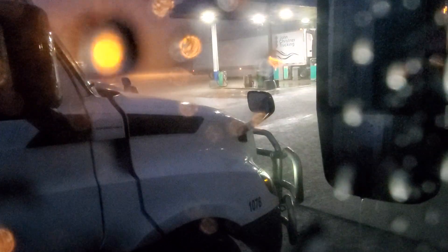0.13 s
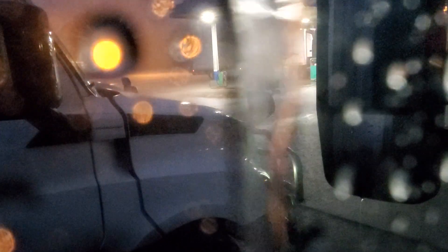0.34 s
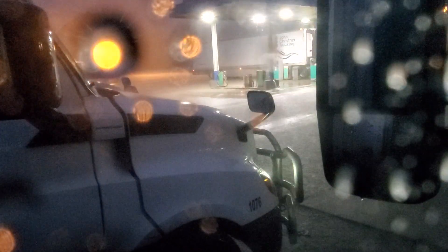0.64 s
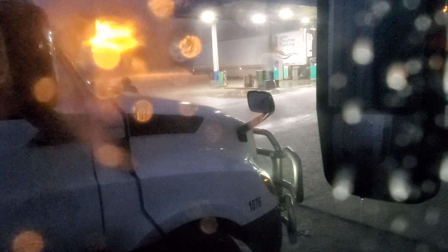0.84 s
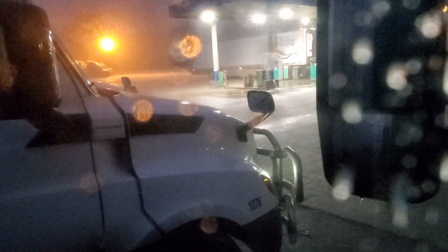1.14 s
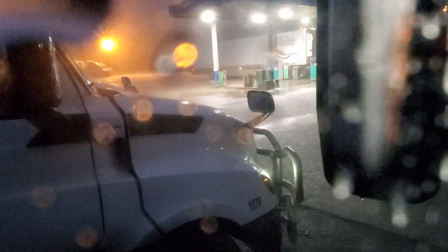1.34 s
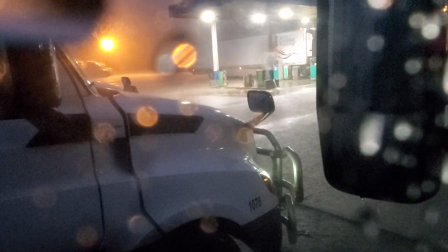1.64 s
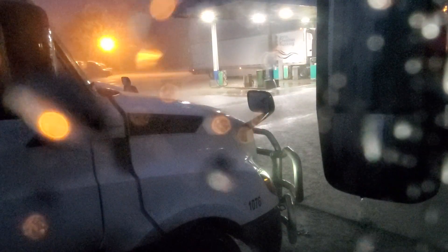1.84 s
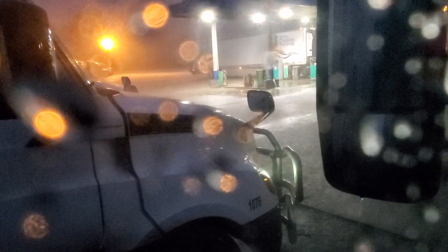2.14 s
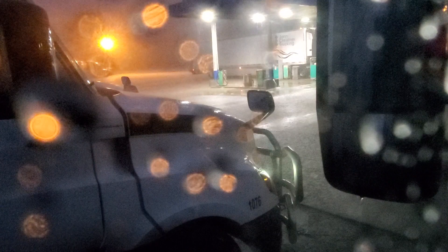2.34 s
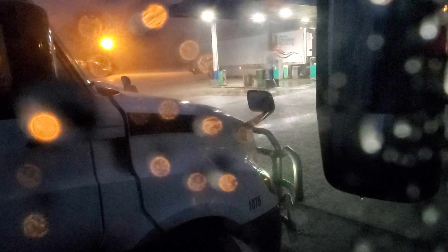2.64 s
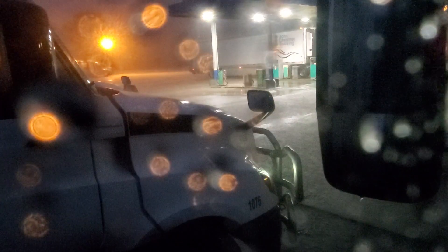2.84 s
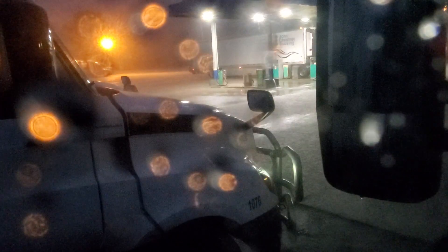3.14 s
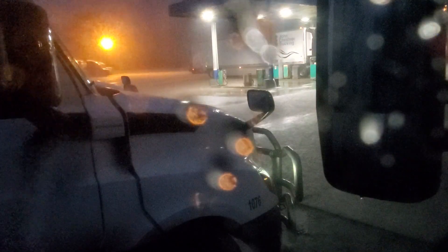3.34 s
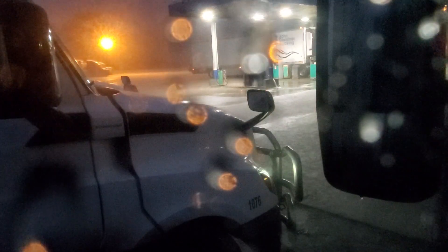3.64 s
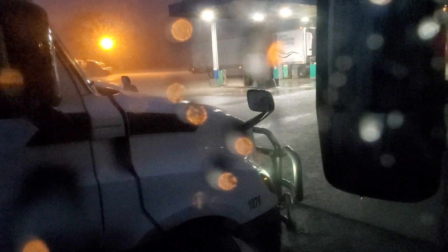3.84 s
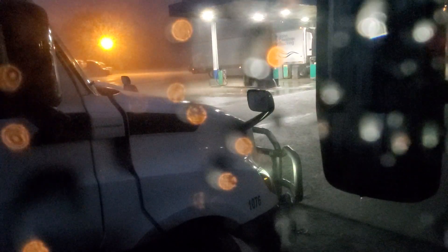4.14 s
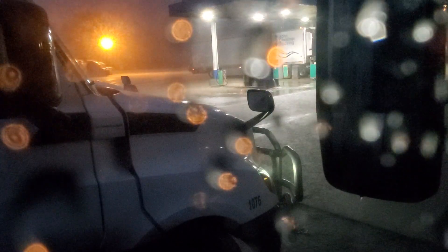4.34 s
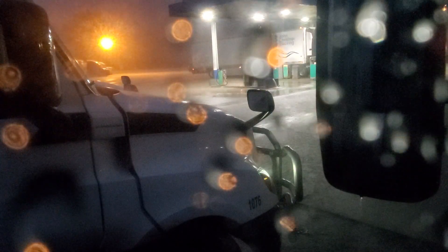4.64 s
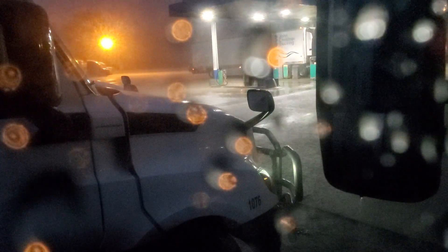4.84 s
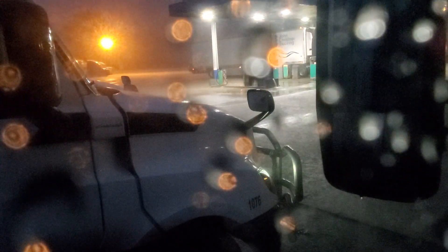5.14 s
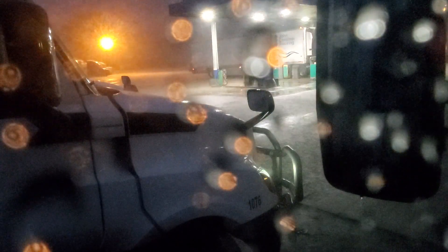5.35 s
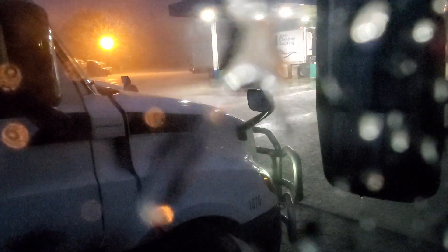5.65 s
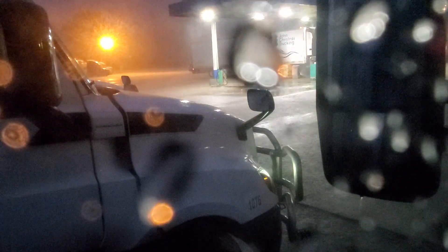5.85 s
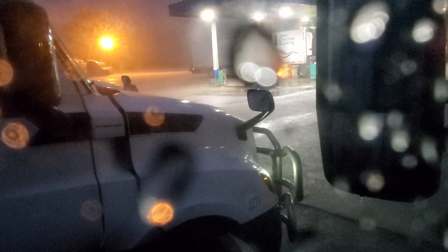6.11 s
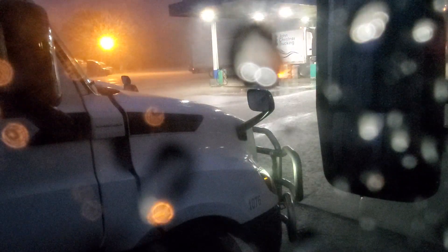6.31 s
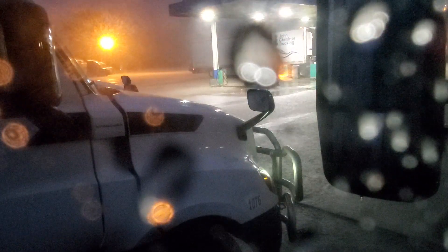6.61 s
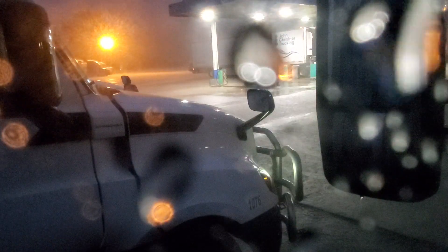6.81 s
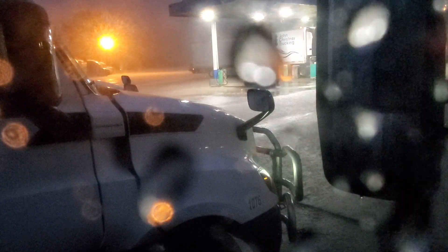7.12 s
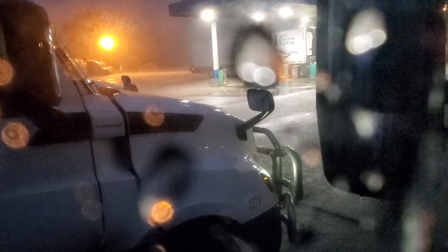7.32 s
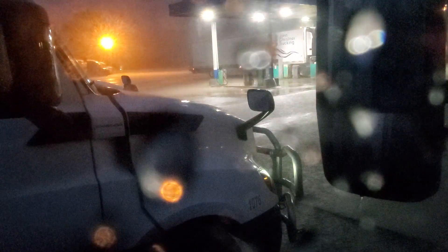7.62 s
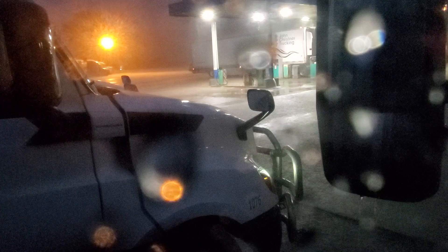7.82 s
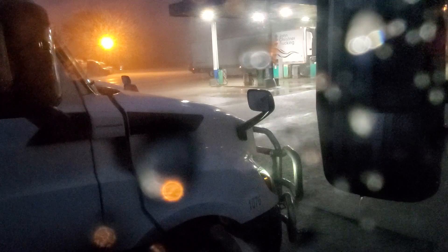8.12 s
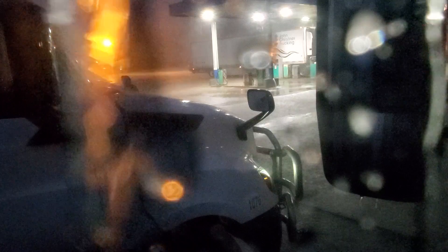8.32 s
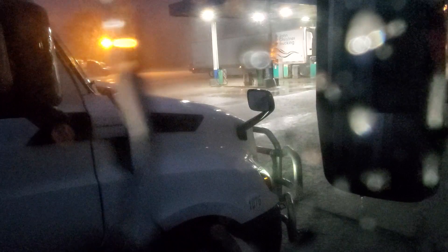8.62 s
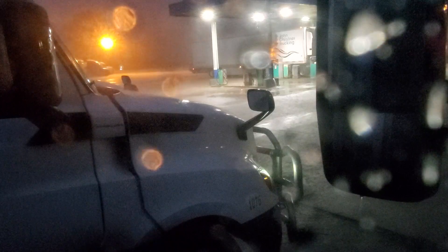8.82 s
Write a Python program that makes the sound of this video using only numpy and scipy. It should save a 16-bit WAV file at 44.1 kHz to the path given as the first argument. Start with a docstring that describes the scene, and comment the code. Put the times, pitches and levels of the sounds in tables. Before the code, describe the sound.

From inside a parked truck cab, a deep diesel idle runs for the whole nine seconds, a centred bass throb near 45 hertz, swelling and sinking roughly once a second as neighbouring trucks slide in and out of step. A soft hollow drone fills the cab. Rain drums dully on the lined roof, patters brighter on panels and leaves a faint hiss of spray on glass, in wide stereo. Crisp drops tick on the near window, leaning left, notably at about 2.5, 4.0, 5.5 and 8.8 s, among tiny metallic pings and plinks. Rain strengthens around 2 to 3.5 s; far thunder murmurs beneath and rolls gently at 4.2 s. Short flurries come near 5.7, 6.2 and 6.9 s. The rain eases around 7.5 s, then from about 7.7 s slants, less roof drumming and more bright patter, with flurries at 8.15 and 8.6 s, building to the end.

```python
"""A slow bass throb runs throughout: from the seat of a parked diesel truck, its engine and its neighbours' idle at
slightly different speeds, as summed tones that slide in and out of step. Rain drums on the cab as showers of
noise bursts; single drops tick on the near left window as noise, and pats and plinks sound within the rain as
short noise and decaying sines. Under it, far thunder murmurs and rolls once, and the cab drones, both as shaped
noise. A two-port microphone hears the rain and thunder in stereo and the engines alike in both ports."""
import sys
import numpy as np
from scipy import signal
from scipy.fft import rfft, irfft, next_fast_len
from scipy.io import wavfile
from scipy.ndimage import map_coordinates

SR = 44100
rng = np.random.default_rng(int(sys.argv[2]) if len(sys.argv) > 2 else 0)


def store_pcm(level_fs):
    """Save levels as 16-bit WAV."""
    pcm = np.round(np.clip(level_fs, -1, 1) * 32767).astype(np.int16)
    wavfile.write(sys.argv[1], SR, np.atleast_2d(pcm).T)


N = 395577
TIME = np.arange(N) / SR


def amp(db):
    """Decibels to gain."""
    return 10 ** (np.asarray(db) / 20)


def unit(x):
    """Scaled to rms 1."""
    return x / np.sqrt(np.mean(x ** 2) + 1e-20)


def along(points, hz):
    """(frequency [Hz], value) points joined on a log frequency axis."""
    f, v = np.transpose(points)
    return np.interp(np.log(hz + 1), np.log(f + 1), v)


def curves(rows):
    """One value per sample for each column after the time."""
    s, *cols = np.transpose(rows)
    return [np.interp(TIME, s, c) for c in cols]


def wobble(rate):
    """A smooth random curve, rate knots a second."""
    knots = rng.standard_normal(int(N * rate / SR) + 4)
    return map_coordinates(knots, [TIME * rate])


def swell(at, rise, fall):
    """A smooth hump of height 1 at time at [s]."""
    width = np.where(TIME < at, rise, fall)
    return np.exp(-((TIME - at) / width) ** 2)


def filtered(x, response):
    """x times a response of frequency."""
    n = x.shape[-1]
    m = next_fast_len(n + 4096)
    spectrum = rfft(x, m) * response(np.fft.rfftfreq(m, 1 / SR))
    return irfft(spectrum, m)[..., :n]


def add(track, s, sound):
    """Mix a short stereo sound in at time s."""
    room = track[:, max(round(s * SR), 0):][:, :sound.shape[1]]
    room += sound[:, :room.shape[1]]


# likeness of the two microphone ports: (frequency [Hz], likeness [0-1])
PORT_LIKENESS = [(180, 0.98), (300, 0.91), (480, 0.63), (820, 0.7), (960, 0.27), (1500, 0.45), (2600, 0.11),
                 (4400, 0.083), (6000, .05)]
# lead of the left port: (frequency [Hz], lead [s])
LEFT_LEAD = [(200, 0.000048), (480, 0.00011), (680, .00001), (830, 0.000028), (970, 0.00037),
             (4400, 0.000396)]


def in_cab(pair, spectrum):
    """Colour two unrelated signals and spread them: bass alike in both ports, left a little early, mid at rms 1."""
    def mid_and_side(hz):
        turn = np.arccos(np.clip(along(PORT_LIKENESS, hz), 0, 1)) / 2
        return amp(along(spectrum, hz)) * [np.cos(turn), np.sin(turn)]

    mid, side = filtered(pair, mid_and_side)
    right = filtered(mid - side, lambda hz: np.exp(-2j * np.pi * hz * along(LEFT_LEAD, hz)))
    ears = np.array([mid + side, right])
    return ears / np.std(ears.mean(0))


# resonances of the cab, its panels and its glass: (frequency [Hz], width [Hz], lift [dB])
CAB_RESONANCES = [(236, 20, 2), (314, 18, 3), (395, 20, 2.5), (440, 26, 2), (546, 26, 3), (598, 22, 2),
                  (655, 44, 3), (828, 40, 2.5), (1660, 90, 2), (2680, 170, 2), (3900, 130, 3),
                  (4500, 180, 3.5), (5750, 250, 3)]


def cab_colour(hz):
    """The gain that the cab's resonances give to the weather sounds."""
    lifts = (db / (1 + (2 * (hz - centre) / width) ** 2) for centre, width, db in CAB_RESONANCES)
    return amp(sum(lifts))


THUNDER_DB, THUNDER_FADE_DB_PER_S = -36.5, .1
ROLL_AT_S, ROLL_RISE_S, ROLL_FALL_S, ROLL_DB = 4.23, 0.42, 0.2, 7
# spectrum of far thunder: (frequency [Hz], relative level [dB per Hz])
THUNDER_SPECTRUM = [(12, -24), (26, -15), (37, -10), (45, -1), (51, 0), (60, -3), (76, -9), (110, -25),
                    (250, -60)]


def thunder(waver_db=0.9):
    """Far thunder is low noise: a murmur that fades, and one roll that swells out of it."""
    roll_db = ROLL_DB * swell(ROLL_AT_S, ROLL_RISE_S, ROLL_FALL_S)
    level_db = THUNDER_DB - THUNDER_FADE_DB_PER_S * TIME + roll_db + waver_db * wobble(2.99)
    return amp(level_db) * in_cab(rng.standard_normal((2, N)), THUNDER_SPECTRUM)


DRONE_DB, DRONE_ROLL_DB = -34.5, 3.5  # its level, and how much the thunder roll lifts it
# spectrum of the hollow cab: (frequency [Hz], relative level [dB per Hz])
DRONE_SPECTRUM = [(60, -45), (78, -4.5), (100, -2), (120, -3), (155, 1.5), (200, -1.5), (235, -5.5),
                  (270, -11.5), (450, -43), (1000, -72)]


def drone(shake=0.31, waver_db=1.0):
    """The cab's hollow drone is noise shaken by each firing of the first truck."""
    roll_db = DRONE_ROLL_DB * swell(ROLL_AT_S, ROLL_RISE_S, ROLL_FALL_S)
    level_db = DRONE_DB + roll_db + waver_db * wobble(2.97)
    rate, first, _ = TRUCKS[0]
    firing = 1 + shake * np.cos(2 * np.pi * rate * (TIME - first))
    return amp(level_db) * in_cab(firing * rng.standard_normal((2, N)), DRONE_SPECTRUM)


def pings(rate=110, db=-45, spread_db=1.0, pitch_hz=1900, octaves=.7, cycles=70):
    """Small drops each ring one spot of sheet metal or glass, at its own pitch; high ones are fainter."""
    track, t = np.zeros((2, N)), np.arange(SR // 12) / SR
    for when, size, high, low, side in rng.random((int(rate * N / SR), 5)):
        # pitches crowd round the middle and reach twice the octaves either way
        hz = pitch_hz * 2 ** (2 * octaves * (high - low))
        level = db - spread_db * np.log(size + 0.035) - 14 * np.log10(hz / pitch_hz)
        fade = amp(level - 60 * t * hz / cycles)  # 60 dB down after this many cycles
        # a different phase at the right port
        ring = np.sin(2 * np.pi * (hz * t + [[0], [side]])) * fade
        add(track, when * N / SR, ring)
    return track


# short pats and plinks within the rain, dull or bright: (time [s], relative level [dB], pitch [Hz])
PATS_AND_PLINKS = [(0.085, -25, 636), (0.673, -27, 1270), (1.114, -31, 2610), (1.224, -29, 560),
                   (2.457, -27, 2600), (2.912, -27.5, 1340), (3.178, -34.5, 3840), (3.319, -29, 2640),
                   (3.645, -28, 930), (3.773, -28, 1260), (5.455, -28, 1250), (6.156, -26, 540),
                   (6.19, -26.5, 1650), (6.386, -29, 1265), (7.772, -25, 1170), (8.392, -28, 600),
                   (8.569, -28, 1880), (8.889, -28, 1180)]
# modes of each plink, as of sheet metal: (multiple of its pitch, relative level [dB])
SHEET_MODES = [(.62, -7), (.93, -9), (1, 1), (1.09, -2.5), (1.47, -12.5), (2.1, -24)]


def pats_and_plinks(t60=0.044, pat_db=-1, pat_t60=0.02, pat_reach=1.5):
    """A short pat of noise, as dull or bright as its pitch, over the dying modes of sheet metal."""
    track, t = np.zeros((2, N)), np.arange(SR // 6) / SR
    for s, db, pitch_hz in PATS_AND_PLINKS:
        plink = 0
        for k, level in SHEET_MODES:
            tone = np.sin(2 * np.pi * (k * pitch_hz * t + rng.random()))
            plink = plink + amp(level - 60 * t / t60) * tone
        noise = rng.standard_normal((2, len(t)))
        pat = unit(filtered(noise, lambda hz: 1 / (1 + (hz / (pat_reach * pitch_hz)) ** 2)))
        add(track, s, amp(db - 7.5) * (plink + amp(pat_db - 60 * t / pat_t60) * pat))
    return track


# small drops fall at random, with scattered (drop, tap, splash) relative levels [dB]
SMALL_DROPS_PER_S, SMALL_DROP, SMALL_SCATTER_DB = 1.8, (-40, -4.5, -15), 1.5
SMALL_FOLLOWS_RAIN = 1.4  # bigger in heavier rain: dB for each dB in the rain table
# big drops on the near window: (time [s], relative level [dB], relative tap [dB], relative splash [dB])
BIG_DROPS = [(1.3748, -35, -15, -17), (2.1824, -32.5, -1, -16), (2.4551, -26.5, -5, -16),
             (2.5301, -34, -6, -17), (2.6918, -35.5, -4, -15), (3.472, -35, -9, -21),
             (3.5264, -35, -2, -20), (3.5733, -38, -5, -17), (3.921, -44, -6, -5), (4.0412, -30, -5, -17),
             (4.7995, -33, 0.5, -17), (4.9095, -33, -2.5, -13), (4.9891, -32.5, -5, -19),
             (5.4548, -25.5, -5.5, -23), (5.9199, -36, -11, -5), (6.2038, -36.5, -9, -17),
             (7.2416, -34, -3, -26), (7.8152, -40.5, 5, -11), (8.143, -38, 1, -18), (8.5688, -39.5, 7, -18),
             (8.8174, -27.5, -7, -11.5)]


def window_drops(t60=0.039, tail_db=-25, tail_t60=0.25, rise=0.00098):
    """Each near drop taps the glass, ticks and splashes; the small cab holds the sound for a moment."""
    track, t = np.zeros((2, N)), np.arange(SR // 8) / SR
    body_and_tail = amp(-60 * t / t60) + amp(tail_db - 60 * t / tail_t60)
    fade = body_and_tail * (1 - np.exp(-t / rise))
    small = []
    for _ in range(int(SMALL_DROPS_PER_S * N / SR)):
        s = rng.random() * N / SR
        db, tap_db, splash_db = SMALL_DROP + SMALL_SCATTER_DB * rng.standard_normal(3)
        rain_db = np.interp(s, *np.transpose(RAIN_STRENGTH))
        small.append((s, db + SMALL_FOLLOWS_RAIN * rain_db, tap_db, splash_db))
    for s, db, tap_db, splash_db in list(BIG_DROPS) + small:
        # (frequency [Hz], level [dB])
        tap = [(400, tap_db - 2), (1500, tap_db + 7.0), (3700, tap_db + 3.0)]
        tick = [(5200, -7), (8000, -11)]
        splash = [(10000, splash_db - 0.5), (13000, splash_db + 5), (15800, splash_db - 7)]
        noise = rng.standard_normal((2, len(t)))
        burst = filtered(noise, lambda hz: amp(along(tap + tick + splash, hz)))
        add(track, s, amp(db + 5.5) * fade * burst * amp([[1], [-1]]))  # stronger on the left
    return track


def shower(rate, spread_db, t60, wash_db):
    """Countless impacts of random size, each a dying burst, over the wash of those too far to tell apart."""
    draws = rng.random((int(rate * N / SR), 3))
    size = amp(-spread_db * np.log(draws[:, 1] + .01))
    place = (draws[:, 0] * N).astype(int)
    ring = amp(-60 * np.arange(SR // 8) / SR / t60) ** 2
    shares = (.5 + draws[:, 2], 3 / 2 - draws[:, 2])  # of the energy, left and right
    energy = np.array([np.bincount(place, size ** 2 * share, N) for share in shares])
    energy = np.abs(signal.fftconvolve(energy, ring[None], axes=1)[:, :N])
    return np.sqrt(energy / energy.mean() + amp(wash_db) ** 2) * rng.standard_normal((2, N))


# late on, the wind slants the rain off the roof and onto the panels and glass
SLANT_START_S, SLANT_TAKES_S = 7.68, .55
# each surface: (level [dB], dB for each dB of rain, change with the slant [dB])
ON_ROOF, ON_PANELS, ON_GLASS = (-38, 0.98, -1.7), (-44, 1, 1.3), (-59, 0.95, 2.2)
FLURRY_RISE_S, FLURRY_FALL_S = 0.1, 0.078
# how hard it rains, before each surface's response: (time [s], level over the usual [dB])
RAIN_STRENGTH = [(0, -.3), (.4, -1.5), (1.05, -0.45), (1.8, 0.4), (2.7, 1), (3.05, 0.8), (3.35, 1.5),
                 (4.65, -1.55), (4.9, 0), (5.55, .3), (6, -1.7), (6.6, -0.4), (7.05, 0.7), (7.35, -1.5),
                 (8, -2.5), (8.97, 1.4)]
# flurries of heavier rain, added to that strength: (time of the height [s], extra level [dB])
RAIN_FLURRIES = [(2.14, 2), (2.5, 0.8), (5.72, 2.5), (6.18, 2), (6.85, 2), (8.15, 3), (8.61, 1.5)]
# spectra of rain on the roof, panels and glass: (frequency [Hz], relative level [dB per Hz])
ROOF_SPECTRUM = [(150, -33), (260, 0), (330, -1), (430, 0), (600, -2), (715, -5.5), (820, -5), (950, -7),
                 (1300, -23), (3000, -62)]
PANEL_SPECTRUM = [(600, -8), (950, 0.5), (1200, 3.5), (1450, 1), (1800, 1), (2250, -2.5), (2700, -5),
                  (3300, -9.5), (4300, -15.5), (5200, -25.5), (9000, -39)]
SPRAY_SPECTRUM = [(2500, -23), (4300, -1), (6300, 0.5), (7000, 0.5), (8100, 2), (9000, -5), (10500, -6.5),
                  (12300, -2), (14000, -6.5), (15800, -10)]


def rain(flutter_db=0.77, waver_db=0.29):
    """One rainfall drives dull drumming on the lined roof, brighter patter on the panels, fine spray on the glass."""
    strength_db = curves(RAIN_STRENGTH)[0] + waver_db * wobble(8)
    for s, db in RAIN_FLURRIES:
        strength_db = strength_db + db * swell(s, FLURRY_RISE_S, FLURRY_FALL_S)
    slant = np.clip((TIME - SLANT_START_S) / SLANT_TAKES_S, 0, 1)
    roof_db, panel_db, spray_db = [db + follows * strength_db + slant_db * slant
                                   for db, follows, slant_db in (ON_ROOF, ON_PANELS, ON_GLASS)]
    spray_db = spray_db + flutter_db * wobble(14)  # the light spray also flutters quickly
    roof = in_cab(shower(rate=300, spread_db=3.0, t60=0.09, wash_db=1.5), ROOF_SPECTRUM)
    panels = in_cab(shower(rate=260, spread_db=3, t60=.035, wash_db=4.0), PANEL_SPECTRUM)
    spray = in_cab(shower(rate=150, spread_db=3.5, t60=0.075, wash_db=1.5), SPRAY_SPECTRUM)
    return amp(roof_db) * roof + amp(panel_db) * panels + amp(spray_db) * spray


# idling trucks: (firing rate [1/s], time of a firing [s], phase offset of the tones [rad])
TRUCKS = [(45.012, .0001, .4), (43.76, .0156, 4.1), (44.825, .0231, .4), (41.668, .0191, 1),
          (32.51, .0244, 1), (38.503, .0258, 1)]
# exhaust tones, one list for each truck: (multiple of its firing rate, rms level before unsteadiness [dB])
EXHAUST_TONES = [
    [(2 / 3, -50), (1, -22.5), (4 / 3, -52), (2, -36.9), (3, -43)],
    [(1, -25), (2, -38.8), (3, -36), (4, -37.6), (5, -54)],
    [(1 / 2, -51), (1, -38), (3 / 2, -47), (2, -39.5)],
    [(1, -40), (2, -45.5), (3, -51)],
    [(1, -43), (3 / 2, -45), (2, -45), (3, -46)],
    [(1, -46)],
]


def engines(unsteady_db=0.38):
    """Governed diesels hold their speeds, so their exhaust tones slide in and out of step."""
    sound = np.zeros(N)
    for (rate, first, phase_offset), tones in zip(TRUCKS, EXHAUST_TONES):
        angle = 2 * np.pi * rate * (TIME - first)
        note = 0
        for k, db in tones:
            multiple = round(k * 6) / 6  # six cylinders: whole sixths of the firing rate
            offset = phase_offset * (k - 1) ** 2  # grows with distance from the firing rate
            note = note + amp(db) * np.cos(multiple * angle - offset)
        sound += np.sqrt(2) * note * amp(unsteady_db * wobble(14))
    return sound


# the wet window is nearer on the left: (frequency [Hz], left over right [dB])
LEFT_OVER_RIGHT = [(60, 4), (110, 4.5), (200, 0), (380, 2.5), (700, 1), (1290, 3.5), (2380, 3.0), (4400, 1),
                   (8120, 0.5), (15000, 7.5)]


def scene():
    """Everything as heard from the seat: weather through the cab and stronger on the left, engines centred."""
    weather = thunder() + drone() + pings() + pats_and_plinks() + window_drops() + rain()
    nearer = lambda hz: amp(np.array([[.5], [-.5]]) * along(LEFT_OVER_RIGHT, hz))
    return engines() + filtered(weather, lambda hz: cab_colour(hz) * nearer(hz))


TOP_HZ = 15800


def record(dry):
    """The microphone passes nothing from its band limit up."""
    return filtered(dry, lambda hz: hz < TOP_HZ)


dry = scene()
out = record(dry)
store_pcm(out)
```